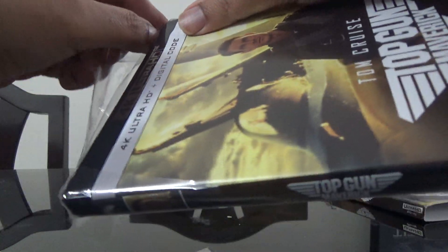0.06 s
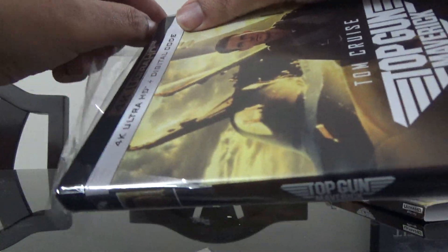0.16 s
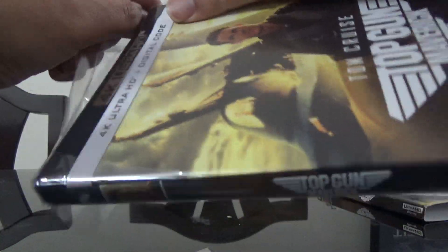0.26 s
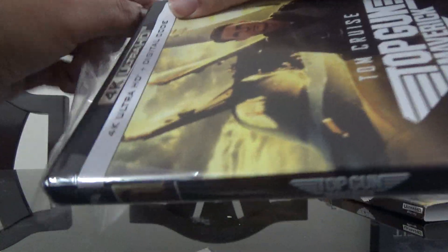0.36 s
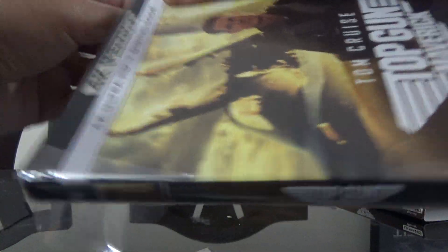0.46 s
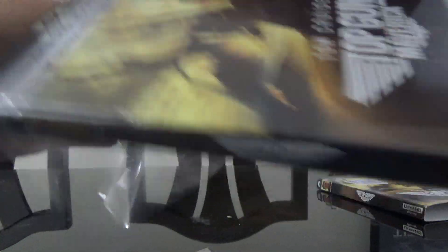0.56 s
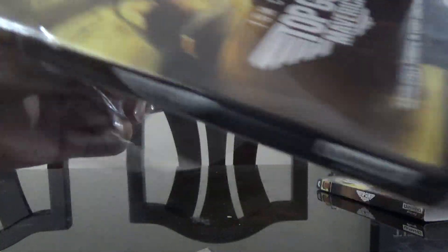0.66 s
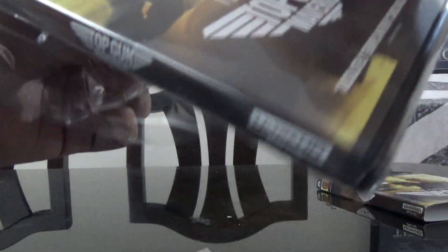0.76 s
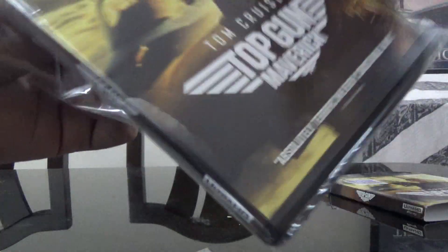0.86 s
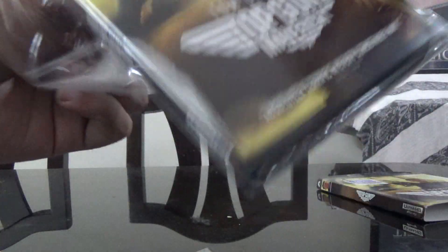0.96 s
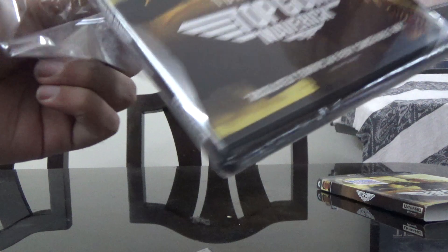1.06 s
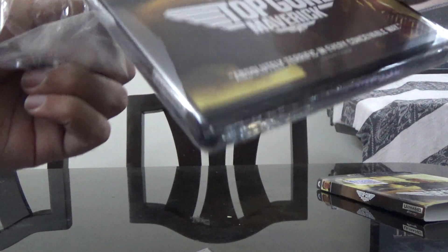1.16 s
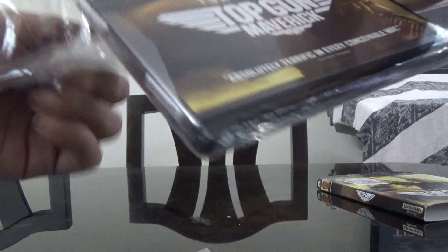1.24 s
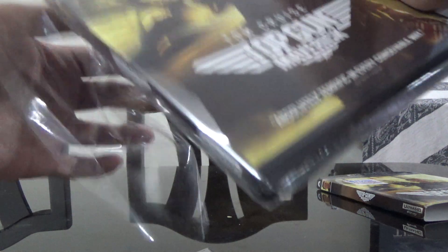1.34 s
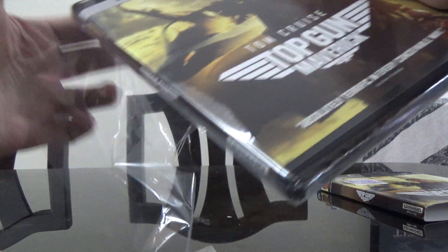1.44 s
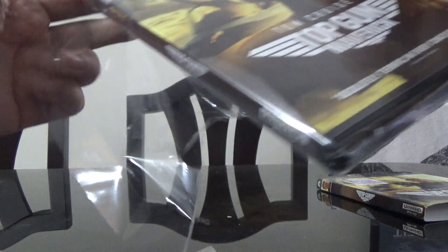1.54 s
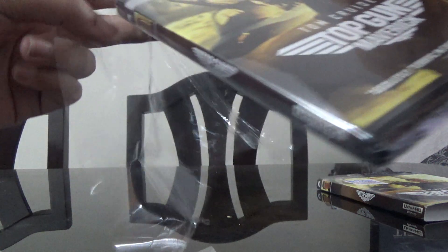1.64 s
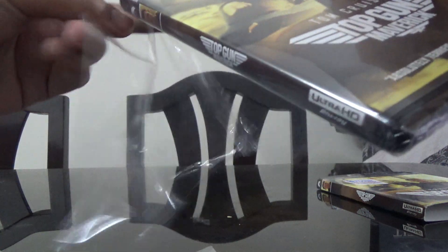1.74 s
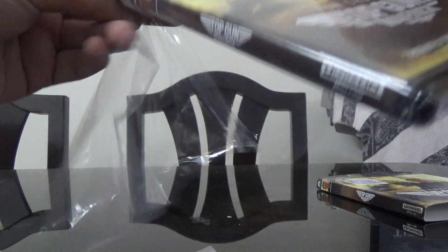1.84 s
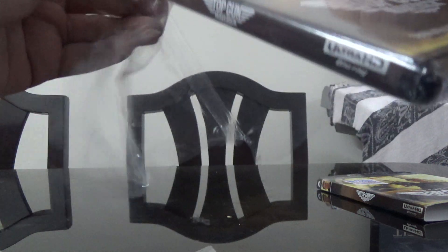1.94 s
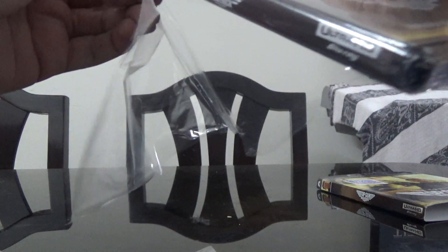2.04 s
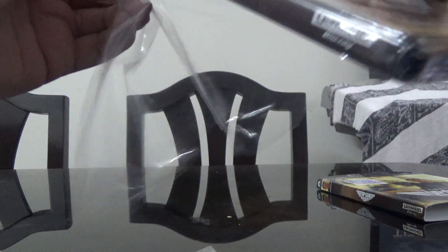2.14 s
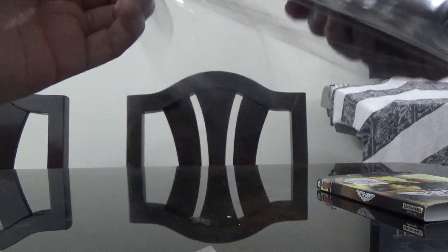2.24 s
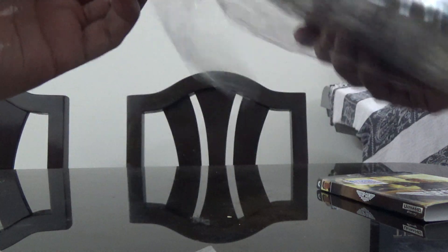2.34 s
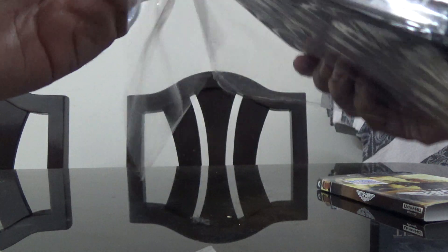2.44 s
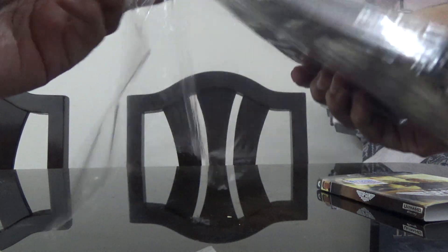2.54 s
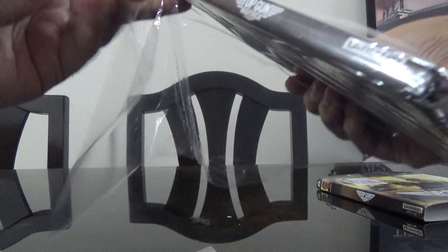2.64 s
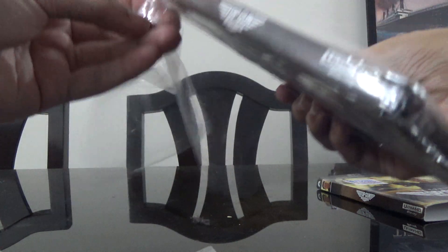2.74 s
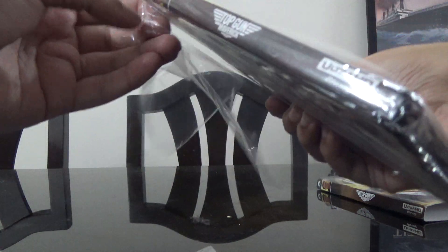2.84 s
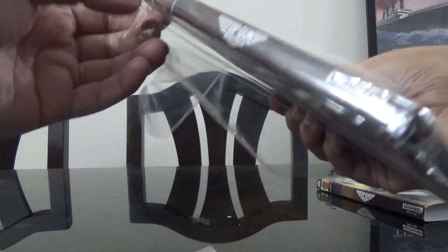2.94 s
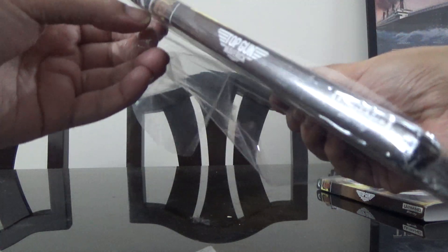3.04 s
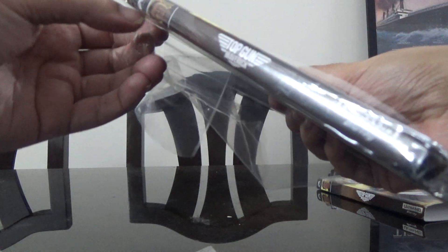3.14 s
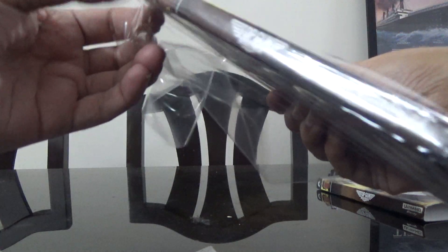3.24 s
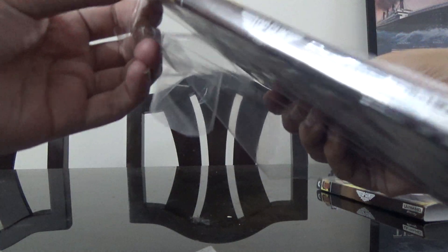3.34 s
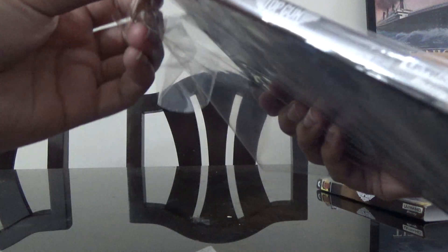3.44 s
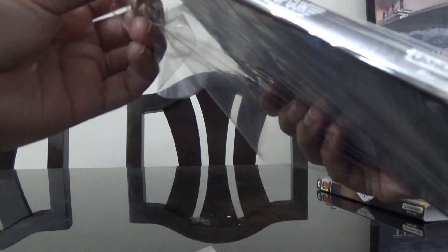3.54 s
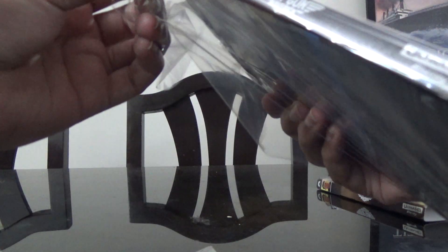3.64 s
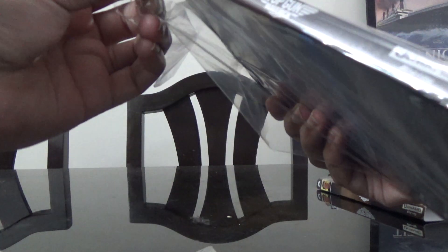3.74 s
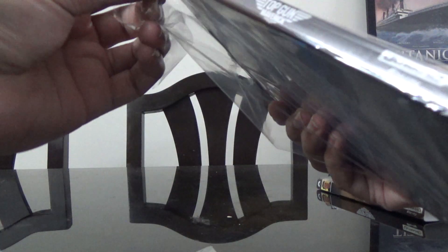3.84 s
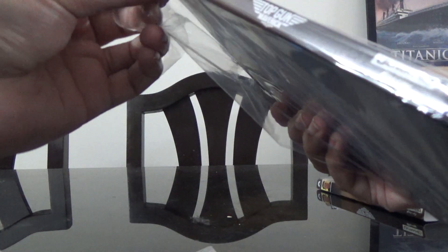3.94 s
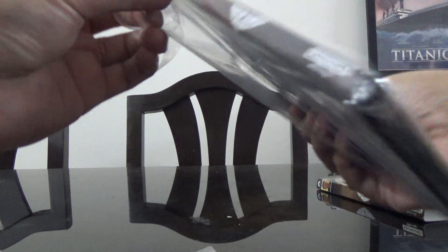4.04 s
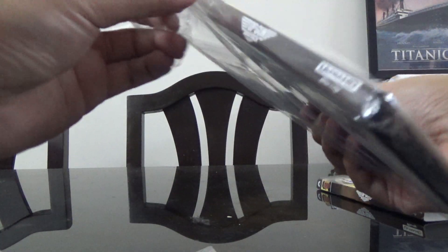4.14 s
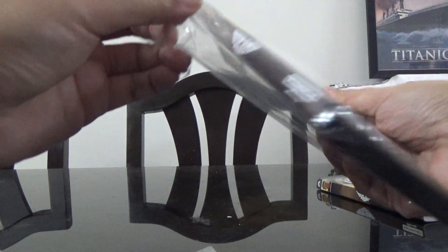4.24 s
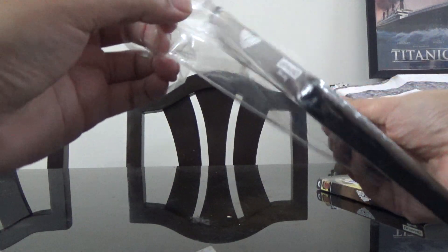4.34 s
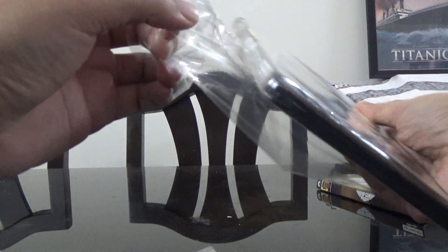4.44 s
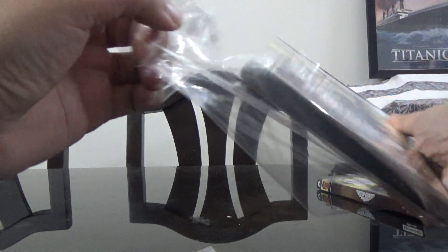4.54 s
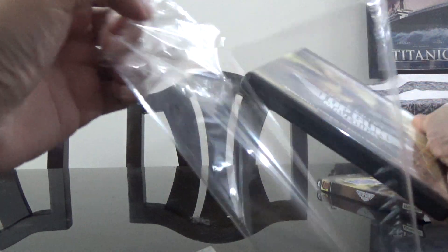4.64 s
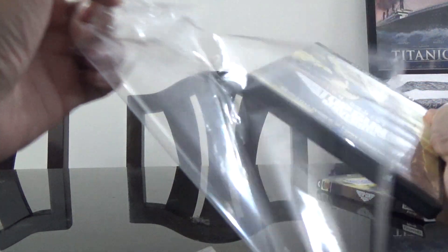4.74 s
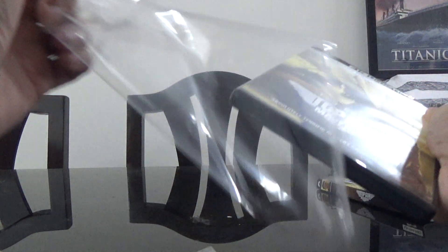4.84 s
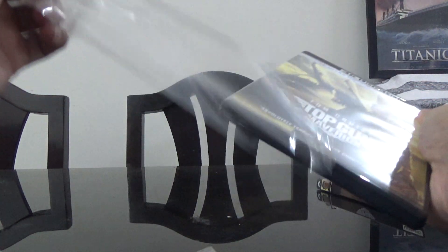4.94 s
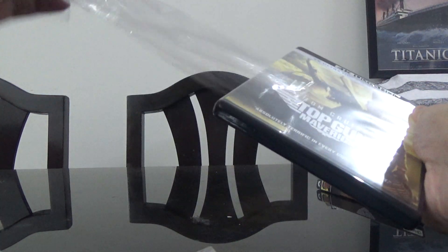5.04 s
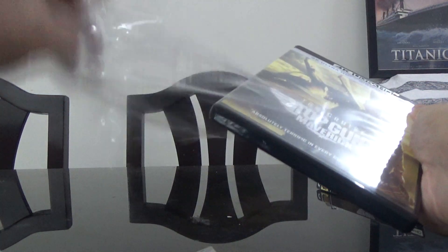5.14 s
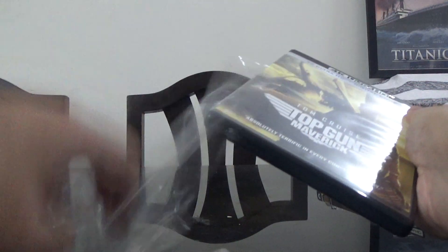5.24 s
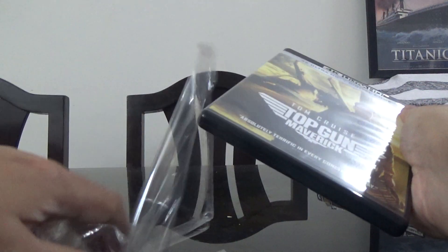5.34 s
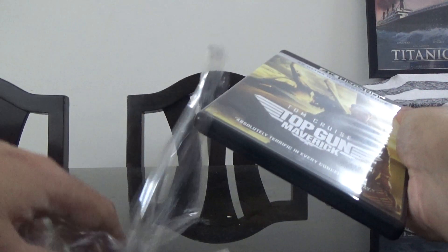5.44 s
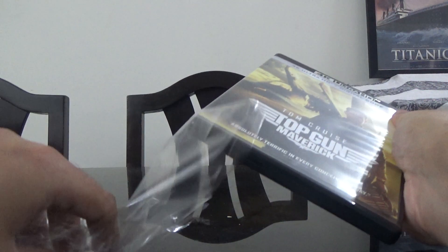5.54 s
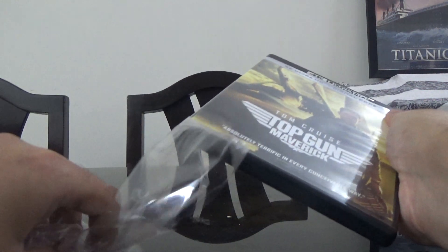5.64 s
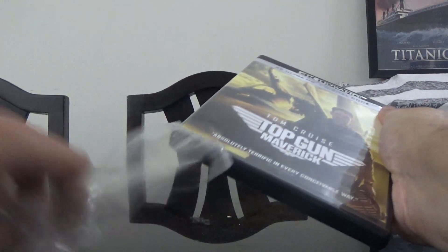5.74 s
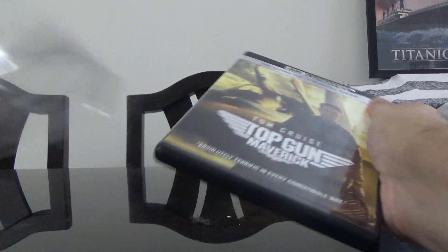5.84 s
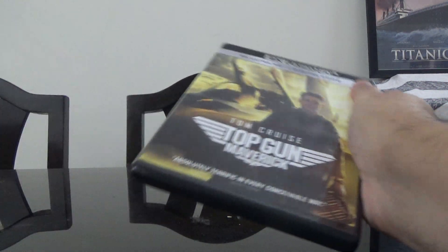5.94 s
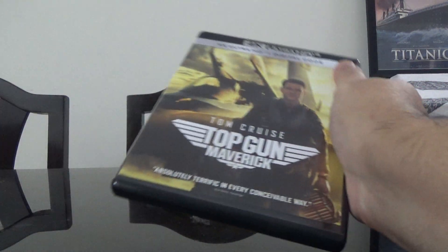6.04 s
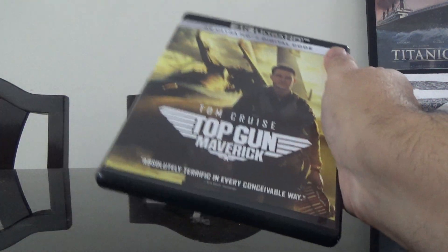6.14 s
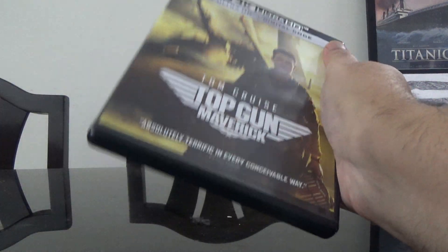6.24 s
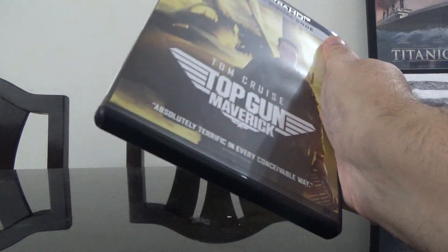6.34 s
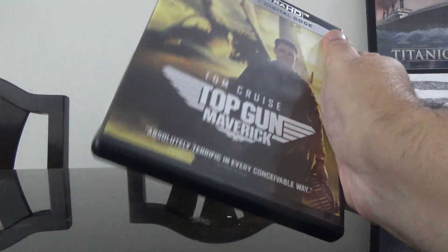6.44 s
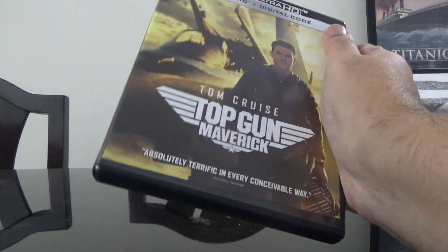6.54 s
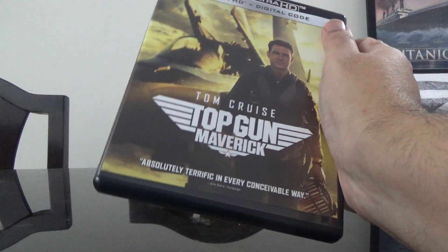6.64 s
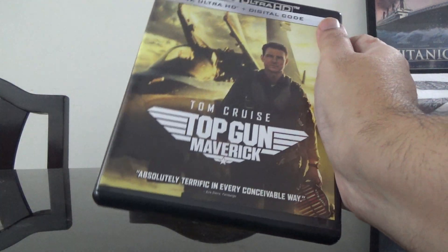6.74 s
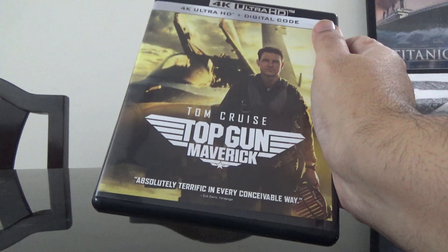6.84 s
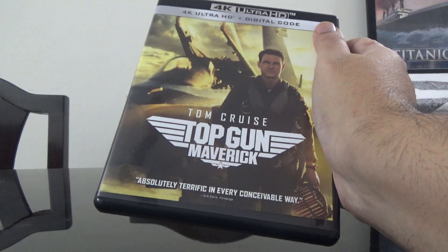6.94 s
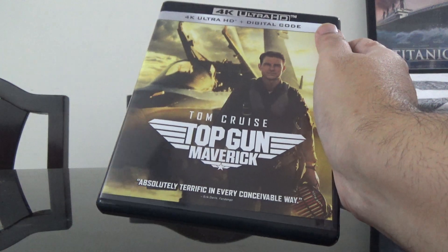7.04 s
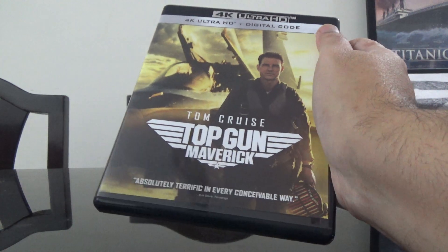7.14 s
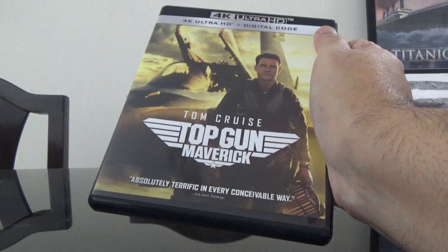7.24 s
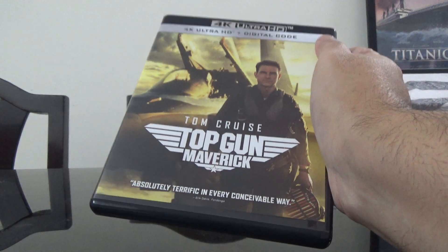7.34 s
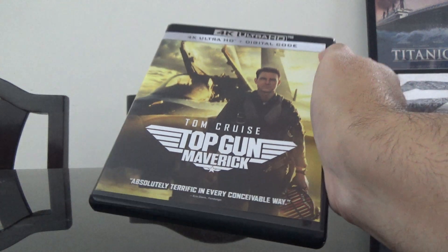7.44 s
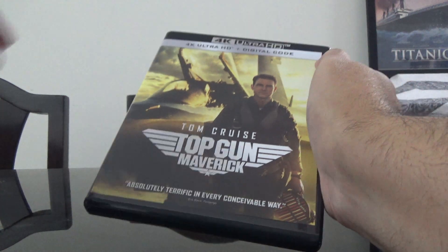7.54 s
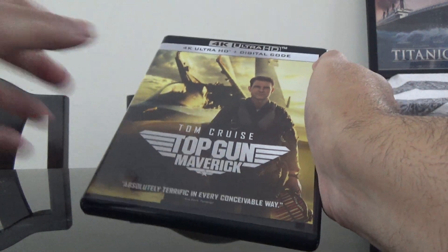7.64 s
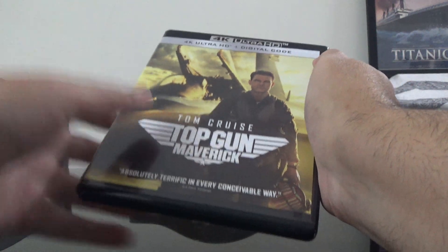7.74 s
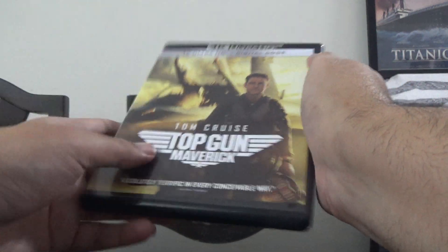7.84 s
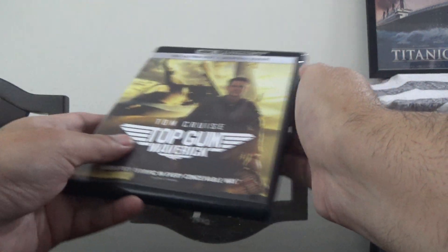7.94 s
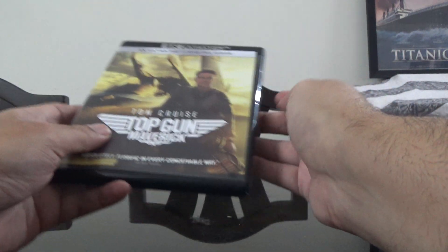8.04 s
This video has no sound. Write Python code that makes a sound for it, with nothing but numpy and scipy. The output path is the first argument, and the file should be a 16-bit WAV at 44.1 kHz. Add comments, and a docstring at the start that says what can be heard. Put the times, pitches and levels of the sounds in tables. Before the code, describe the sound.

Close, sharp crinkling and snapping of clear film being pulled from a plastic case, a denser hand crumple, soft rustles, and finally faint fingertip taps.

```python
"""Tiny clicks and loud snaps come first: shrink wrap is torn and peeled off a plastic disc case, close up in
a small room. The film is then crumpled in one hand and rustles off the back; fingers tap the case at the end.
Film: random ringing clicks in three bands, merging into smooth hiss at times; snaps are ringing noise bursts,
tears dense noise, short resonances filtered noise. Case: damped modes with a contact tick.
Room: early reflections, a decaying noise tail and steady faint air noise."""
import sys
import numpy as np
from scipy import signal
from scipy.fft import rfft, irfft, next_fast_len
from scipy.io import wavfile
from scipy.ndimage import uniform_filter1d

SR = 44100
rng = np.random.default_rng(int(sys.argv[2]) if len(sys.argv) > 2 else 0)


def output_pcm(signal):
    """Save a mono or channel-first signal as 16-bit PCM at the path in sys.argv[1].

    Samples are clipped to [-1, 1] before scaling.
    """
    pcm = np.clip(np.atleast_2d(signal).T, -1, 1) * 32767
    wavfile.write(sys.argv[1], SR, np.round(pcm).astype(np.int16))


N = 356308

# still air of the room: freq_hz, density_db [dB per Hz, relative]
AIR_SPECTRUM = [(30, -23), (60, -17), (140, -7.5), (250, -1.5), (700, -2.5), (1500, -9.5), (4000, -10.5),
                (9000, -29), (16000, -46)]
# decay of the room: freq_hz, t60_s
ROOM_DECAY = [(200, 0.31), (1500, 0.38), (5000, 0.19), (14000, 0.39)]
# stereo width over frequency: freq_hz, side_gain [ratio]
STEREO_WIDTH = [(130, 0.13), (300, 0.29), (1000, 1.25), (9000, 1.52), (13000, 0.4)]
# where the film is held: time_s, left_minus_right_db
FILM_PLACE = [(1.3, 1.1), (2.2, .45), (4.8, 0), (5.25, 1.3), (5.7, 1.7), (6.05, .15)]
# soft bumps of the hand on the hollow case: start_s, level_db
HAND_BUMPS = [(0.765, -39), (2.28, -40), (2.964, -27.5), (2.971, -32.5), (2.984, -31), (3.001, -42),
              (3.008, -30), (3.04, -36), (3.06, -41), (3.27, -30.5), (3.49, -38), (5.3, -32.5),
              (5.335, -36), (7.999, -44), (8.019, -45)]
# modes of the hollow case: freq_hz, level_db, t60_s
HOLLOW_MODES = [(177, -13.5, 0.077), (231.5, -3, 0.047), (355.6, 1.5, 0.037), (477, 0, 0.04),
                (577, -2.5, 0.046)]
# fingertips tap the lid: start_s, level_db
LID_TAPS = [(7.831, -32.5), (7.846, -39.5), (7.874, -45), (7.883, -31)]
# modes of the lid: freq_hz, level_db, t60_s
LID_MODES = [(690, -8.5, 0.026), (859, -2, 0.019), (1130, 7.5, 0.015), (1460, 3, 0.018), (1700, -8, .02),
             (2220, -1.5, 0.0203), (3070, -14, .012), (4683, -16, .012)]
# short resonant noises (tearing hiss, flexing case, a click, rubs): start_s, length_s, pitch_hz, level_db
FILM_RESONANCES = [(0.274, 0.023, 970, -39), (0.293, 0.053, 2400, -38.5), (0.596, 0.017, 2350, -32),
                   (2.9, 0.073, 2600, -42), (2.96, 0.071, 491, -41.5), (3.939, 0.00485, 1550, -30),
                   (7.977, 0.14, 2700, -59)]
# film tears in one dense run: start_s, length_s, level_db
FILM_TEARS = [(0.591, 0.0075, -26), (0.655, 0.016, -22), (0.998, 0.02, -27), (1.028, 0.00546, -21),
              (1.413, 0.0081, -23), (1.936, 0.011, -23.5), (2.181, 0.0077, -21), (2.288, 0.03, -22.5),
              (2.353, 0.012, -23), (2.378, 0.013, -26), (2.58, 0.019, -23.5), (2.734, 0.032, -26.5),
              (2.994, 0.011, -23.5), (3.097, 0.01, -30), (4.032, 0.021, -29), (4.607, 0.0076, -20.5),
              (4.648, 0.0076, -24), (5.2, 0.0111, -20.5), (5.352, 0.015, -21.5), (6.391, 0.013, -32)]
# loud snaps of single facets: start_s, peak_db, ring_hz, push_db [of the sheet around it]
FACET_SNAPS = [(0.01, -10, 10630, -30), (0.029, -8, 10900, -42), (0.0937, -21, 11000, -40),
               (0.1228, -16.5, 10800, -27), (0.1304, -24, 3570, -17), (0.2109, -18.5, 3580, -35),
               (0.231, -14.5, 4130, -27), (0.2575, -2.5, 9590, -25), (0.3707, -8.5, 8740, -25),
               (0.393, -13, 5660, -13), (0.4399, -7, 10700, -40.5), (0.4459, -4.5, 8800, -36),
               (0.4944, -8.5, 8360, -35.5), (0.5082, -11, 7950, -28), (0.5302, -13, 9890, -28),
               (0.586, -8, 6830, -29), (0.7152, -6, 4900, -31.5), (0.7307, -8.5, 4860, -18.5),
               (0.7503, -9, 4620, -11.5), (0.7721, -8, 7870, -13), (0.7973, -11.5, 4260, -15),
               (0.8068, -10.5, 5270, -16), (0.848, -11, 9700, -28), (0.934, -8, 9610, -15),
               (0.9433, -5, 4970, -20), (0.9831, -10, 4280, -31), (1.0048, -8, 5050, -22),
               (1.0224, -6, 5880, -19), (1.1125, -8, 5370, -39), (1.1245, -11.5, 9400, -38.5),
               (1.1814, -8.5, 7700, -29), (1.2047, -8, 9050, -38.5), (1.2184, -9, 5200, -24.5),
               (1.252, -12.5, 8570, -34.5), (1.3389, -6, 9540, -30), (1.359, -10.5, 6030, -31),
               (1.4088, -6.5, 8630, -16.5), (1.4474, -12, 9750, -30), (1.6287, -10, 6750, -20.5),
               (1.6401, -14, 7540, -19), (1.6681, -10, 5300, -24), (1.694, -11.5, 6680, -35),
               (1.7769, -10, 9260, -33), (1.8337, -6.5, 9240, -32.5), (1.876, -6, 4660, -24),
               (1.9234, -5.5, 5520, -30.5), (2.0403, -7.5, 5400, -24), (2.0884, -10.5, 4800, -43.5),
               (2.1418, -3, 4600, -22), (2.2691, -6, 8480, -24), (2.3291, -6, 8410, -33),
               (2.4174, -12, 4970, -33), (2.4687, -3.5, 4250, -30.5), (2.4879, -4, 5470, -36),
               (2.5721, -6.5, 4290, -29), (2.6182, -7, 9840, -32), (2.6264, -11, 8980, -33),
               (2.717, -10, 8590, -27.5), (2.8098, -6, 9490, -33), (2.8599, -11, 9120, -25),
               (2.922, -9, 9760, -28), (3.0012, -8.5, 6410, -25), (3.0598, -13, 9400, -25),
               (3.0658, -13, 4740, -29), (3.0959, -16, 6230, -30.5), (3.1151, -13, 9540, -30),
               (3.124, -18, 9600, -22), (3.2569, -6.5, 4730, -22.5), (3.2716, -5, 8877, -22),
               (3.3117, -9, 5740, -22), (3.3193, -5, 8960, -25.5), (3.4121, -7, 5700, -29),
               (3.4388, -8, 8940, -41), (3.4695, -7, 9040, -38), (3.4804, -15, 5870, -28),
               (3.5354, -11, 6480, -33), (3.5503, -9.5, 4640, -32.5), (3.6401, -9.5, 4020, -35),
               (3.665, -9.5, 6620, -31), (3.7358, -3, 9000, -28), (3.7608, -4, 9000, -42),
               (3.7634, -11, 9110, -38), (3.7981, -8.5, 10300, -34), (3.8232, -8, 3750, -35),
               (3.911, -10, 9000, -28), (3.949, -9.5, 4900, -36), (3.9943, -14.5, 4960, -19.5),
               (4.0264, -6, 11000, -23), (4.113, -6.5, 8350, -27.5), (4.1619, -11, 6820, -29),
               (4.2158, -6, 6700, -31), (4.3625, -6.5, 5710, -30), (4.4546, -7, 10600, -31),
               (4.4997, -3.5, 9810, -24.5), (4.5387, -6.5, 4350, -26), (4.6314, -9, 10800, -26),
               (4.78, -9, 4440, -21.5), (5.017, -9.5, 5070, -30.5), (5.1196, -4.5, 4200, -26),
               (5.2964, -3, 9280, -20.5), (5.4445, -7.5, 7060, -20), (5.6037, -12, 4270, -30),
               (5.7839, -9.5, 3850, -20.5), (5.814, -9, 8080, -25), (6.0054, -16, 5330, -29),
               (6.054, -17, 9790, -28.5), (6.2292, -14, 10400, -20), (6.3785, -11, 10440, -25),
               (6.4929, -13, 3500, -23), (6.6129, -11, 10800, -29), (6.7242, -10, 9400, -25),
               (7.314, -13.5, 6500, -36), (7.5517, -28, 7370, -31)]
# colour of the film when peeled: freq_hz, density_db [dB per Hz, relative]
PEELED_COLOUR = [(59, -59), (100, -30.5), (219, -16), (452, -13.5), (676, -6), (950, -10), (1450, -7),
                 (2520, -7), (3540, -0.5), (4020, 2), (4770, 4), (7290, 0.5), (9610, 4.5), (14400, -5.5),
                 (16000, -8)]
# when crumpled: freq_hz, density_db [dB per Hz, relative]
CRUMPLED_COLOUR = [(59, -60.5), (100, -37), (215, -15), (415, -14), (608, -2.5), (872, -7.5), (2470, 1.5),
                   (3320, -5), (4290, 1.5), (5530, -3.5), (9820, 5.5), (12400, 0), (16000, -7)]
# when slid off: freq_hz, density_db [dB per Hz, relative]
SLID_COLOUR = [(60, -62), (100, -30.5), (300, -16.5), (690, -3.5), (1150, -5), (1600, -0.5), (1900, 1),
               (2470, -8), (3300, -3), (3900, -7), (5500, -5.5), (10700, 0.5), (12900, -5), (16000, -11)]
# how far the clicks merge into smooth hiss, in tearing, sliding or fading: time_s, hiss_to_clicks [ratio]
HISS_SHARE = [(0.258, 0.09), (0.268, 1.1), (0.35, 2.7), (0.375, 0.18), (4.8, 0.12), (5.2, 0.76),
              (5.85, 0.346), (6.1, 0.71), (7.2, 1), (7.4, 2.32)]
# tautness of the film between moves: time_s, crackle_db
FILM_TENSION = [(0, -48), (.24, -56.5), (.3, -41), (1.0, -36.5), (1.28, -43), (1.59, -51), (1.9, -40),
                (2.45, -38), (2.67, -44), (2.9, -38.5), (3.14, -52), (3.35, -46), (3.97, -47), (4.3, -39.5),
                (4.74, -43.5), (4.88, -57), (4.96, -59), (5.2, -34), (5.7, -39), (5.94, -48.5), (6.3, -46),
                (6.8, -44.5), (7.25, -62.5), (7.45, -59.5), (7.8, -69), (8.05, -59.5)]
# pulls that peel the film off: start_s, length_s, level_db, brightness_db
PULL_MOVES = [(0, .03, -45, 3), (.255, 0.152, -38, 0), (.475, 0.055, -39, 5.5), (.57, 0.05, -34.5, 6.5),
              (.64, 0.041, -29.5, 1.5), (.71, 0.0567, -32.5, -4), (.79, 0.1377, -32, -1),
              (.93, 0.1024, -30.5, 1), (1.04, 0.029, -33, 1), (1.195, .02, -40, -2), (1.305, 0.078, -31, 2),
              (1.403, .045, -29.5, 1), (1.623, 0.025, -31.5, 1.5), (1.675, 0.031, -40.5, 5.5),
              (1.748, 0.041, -40.5, 3.5), (1.803, .018, -33, -3), (1.865, 0.023, -32, 1.5),
              (1.905, 0.063, -29.5, 2.5), (1.985, 0.0479, -33, 3.5), (2.115, 0.0306, -36, 1),
              (2.172, 0.047, -33.5, 2.5), (2.245, 0.083, -26.5, 1.5), (2.345, 0.0401, -26.5, 2),
              (2.445, 0.027, -29.5, 3), (2.54, 0.048, -31.5, -1), (2.612, 0.016, -33.5, 0),
              (2.712, 0.08, -30, 1.5), (2.8, 0.031, -36.5, 1), (2.855, 0.033, -34.5, -2.5),
              (2.925, 0.069, -36, -1.5), (3.2, 0.038, -37.5, 2.5), (3.253, 0.017, -35, -6),
              (3.39, 0.027, -38.5, -1), (3.48, .03, -40.5, 1), (3.55, 0.0458, -36, -0.5),
              (3.73, 0.025, -41.5, -4), (3.81, 0.051, -42.5, 3.5), (4.022, 0.031, -27.5, 3.5),
              (4.07, .048, -33.5, 4.5), (4.175, .065, -33, 3), (4.355, 0.035, -36, 1),
              (4.41, 0.038, -38, 5), (4.495, 0.018, -28.5, 2), (4.565, 0.0522, -31.5, 3.5),
              (4.628, 0.058, -33, 2.5), (4.72, 0.0267, -38.5, 6), (4.772, 0.0083, -34.5, 1)]
# squeezes that crumple the loose film in one hand: start_s, length_s, level_db, brightness_db
SQUEEZE_MOVES = [(4.965, 0.071, -42.5, 0.5), (5.03, 0.15, -33.5, 1.5), (5.18, 0.09, -30, -0.5),
                 (5.262, 0.053, -23.5, -2.5), (5.335, 0.071, -31, -4), (5.43, 0.058, -32, -4),
                 (5.488, .14, -25.5, -3.5), (5.64, 0.101, -32.5, -4), (5.782, 0.051, -33, -4),
                 (5.85, 0.064, -42, -7)]
# strokes that draw the last of it off the back: start_s, length_s, level_db, brightness_db
STROKE_MOVES = [(5.99, 0.117, -42, 7), (6.115, 0.14, -40.5, 4.5), (6.35, 0.061, -37.5, 3),
                (6.43, 0.12, -42.5, 3), (6.645, 0.03, -42, 2), (6.72, 0.11, -41, 3.5), (6.87, 0.11, -59, 0),
                (7.01, 0.086, -53.5, 6), (7.135, 0.0138, -52.5, 7), (7.305, 0.015, -46, 10),
                (7.35, .02, -53.5, 8)]

# shared by all moves of one kind; folds_db: broad folds against creases in a firm move
PULL = dict(attack_s=0.01, release_s=0.016, folds_db=-7.5)
SQUEEZE = dict(attack_s=0.015, release_s=0.02, folds_db=-8.5)
STROKE = dict(attack_s=0.01, release_s=0.03, folds_db=-1.2)

# level of a firm move; folds grow more slowly than creases, and less in a bright move (dB per dB)
FIRM_DB, FOLD_GROWTH, FOLD_TILT = -35, 0.83, 0.5
GRIP_FOLDS_DB, GRIP_FINE_DB = -7, 1.5  # balance of the crackle between moves
JERK_PER_S, JERK_DB = 70, 1.49  # the film yields in small jerks
SNAP_DELAY_S = 0.0006  # every snap sounds this long after its listed time

# lesser snaps: peak over the crackle, ring, push of the sheet
SMALL_SNAP_DB, SMALL_SNAP_SPREAD_DB, SMALL_SNAP_HZ, SMALL_SNAP_PUSH_DB = 19, 4, 7440, -23
# dB of odds gained, and dB of prominence lost, per dB of crackle
SMALL_SNAP_ODDS, SMALL_SNAP_MASKING = 0.5, 0.39

TOP_HZ = 15950  # upper band limit


def amp(db):
    """Decibels to gain."""
    return 10 ** (np.asarray(db) / 20)


def unit(x):
    """Scale to rms 1."""
    return x / np.sqrt(np.mean(x ** 2) + 1e-20)


def along(points, hz):
    """Read (freq_hz, value) points on a log axis."""
    point_hz, value = np.transpose(points)
    return np.interp(np.log(hz + 1), np.log(point_hz + 1), value)


def below(hz, edge_hz, order=4):
    """Gain of a smooth low-pass."""
    return 1 / np.sqrt(1 + (hz / edge_hz) ** (2 * order))


def above(hz, edge_hz, order=4):
    """Gain of the matching high-pass."""
    return (hz / edge_hz) ** order * below(hz, edge_hz, order=order)


def causal(gain, size=1024):
    """Impulse response that starts at once (minimum phase) with this gain of frequency."""
    magnitude = np.maximum(gain(np.fft.rfftfreq(size, 1 / SR)), 1e-5)
    cepstrum = irfft(np.log(magnitude))
    cepstrum[..., 1:size // 2] *= 2
    cepstrum[..., size // 2 + 1:] = 0
    return irfft(np.exp(rfft(cepstrum)))


def coloured(x, gain):
    """Stereo x through a causal filter."""
    return signal.fftconvolve(x, causal(gain)[None], axes=1)[:, :N]


def placed(start_s, sounds, spread_db):
    """Sum short sounds at their times, each a little to the left or right."""
    first = np.round(start_s * SR).astype(int)[:, None]
    index = (first + np.arange(sounds.shape[1])).ravel()
    pan_db = spread_db * rng.standard_normal((len(start_s), 1))
    sides = [np.bincount(index, (sounds * amp(side * pan_db)).ravel(), N)[:N] for side in (1, -1)]
    return np.array(sides)


def narrowed(pair, width):
    """Left and right from a middle and a side signal; width scales the side."""
    middle, side = pair
    return middle + width * side * np.array([[1], [-1]])


def air(level_db=-60):
    """Steady faint noise of the room, shaped by its spectrum."""
    pair = narrowed(rng.standard_normal((2, N)), width=0.71)
    gain = amp(along(AIR_SPECTRUM, np.fft.rfftfreq(N, 1 / SR)))
    return amp(level_db) * unit(irfft(rfft(pair) * gain, N))


def room(x, table_db=-15, tail_db=-13, width=0.51):
    """The table top and nearby things answer within milliseconds, the walls more slowly."""
    hz, frame_s, frames = signal.stft(rng.standard_normal((2, SR // 2)), SR, nperseg=256)
    decay = np.exp(-np.log(1000) * frame_s / along(ROOM_DECAY, hz)[:, None])
    tail = signal.istft(frames * decay, SR, nperseg=256)[1]
    age_s = np.arange(tail.shape[1]) / SR
    sparse = rng.standard_normal(tail.shape) * (rng.random(len(age_s)) < 0.04)
    near = sparse * np.exp(-age_s / 0.0027)
    answer = narrowed(amp(table_db) * unit(near) + amp(tail_db) * unit(tail), width)
    answer = answer / np.sqrt(len(age_s) * (1 + width ** 2))
    answer = np.pad(answer, ((0, 0), (round(0.003 * SR), 0)))  # no reflection before 3 ms
    return signal.fftconvolve(x.mean(0)[None], answer, axes=1)[:, :N]


def knocks(blows, modes, attack_s, tick_db):
    """Every blow rings the damped modes of the case at new strengths, with a short tick of contact."""
    start_s, level_db = np.transpose(blows)
    hz, mode_db, t60_s = np.transpose(modes)[:, :, None]
    t = np.arange(SR // 5) / SR
    tones = np.sin(2 * np.pi * (hz * t + rng.random(hz.shape)))
    rings = amp(mode_db) * np.exp(-np.log(1000) * t / t60_s) * tones
    strengths = amp(2.5 * rng.standard_normal((len(start_s), len(hz))))
    ring = strengths @ rings * (1 - np.exp(-t / attack_s))
    tick = amp(tick_db) * np.exp(-t / 0.00233) * rng.standard_normal(ring.shape)
    tick = signal.sosfilt(signal.butter(1, [300, 7000], "band", fs=SR, output="sos"), tick)
    return placed(start_s, amp(level_db)[:, None] * (ring / 2 + tick), spread_db=3)


def resonances(sharpness=4.8):
    """Noise drives one resonance per event, swelling and fading: tearing hiss, flexing case, a click, rubs."""
    start_s, length_s, ring_hz, level_db = np.transpose(FILM_RESONANCES)[:, :, None]
    t = np.arange(SR // 6) / SR
    hz = np.fft.rfftfreq(len(t), 1 / SR) + 1
    resonance = 1 / (1 + (sharpness * (hz / ring_hz - ring_hz / hz)) ** 2)
    noise = rng.standard_normal((len(start_s), len(t)))
    ringing = irfft(rfft(noise) * resonance, len(t))
    ringing = ringing / ringing.std(1, keepdims=True)
    swell = np.sin(np.pi * np.minimum(t / length_s, 1))
    return placed(start_s[:, 0], amp(level_db) * swell * ringing, spread_db=0.5)


def tears(ragged=0.42):
    """A crack runs through the film: clicks too close to tell apart, as noise of ragged strength."""
    start_s, length_s, level_db = np.transpose(FILM_TEARS)[:, :, None]
    t = np.arange(SR // 30) / SR
    progress = np.minimum(t / np.maximum(length_s, 0.003), 1)
    run = np.sqrt(np.abs(np.sin(np.pi * progress)))
    flutter = unit(uniform_filter1d(rng.standard_normal(run.shape), size=40))
    burst = unit(np.exp(ragged * flutter) * rng.standard_normal(run.shape))
    train = placed(start_s[:, 0], amp(level_db) * run * burst, spread_db=0.5)
    colour = lambda hz: amp(along(PEELED_COLOUR, hz))
    return coloured(train, colour) / np.linalg.norm(causal(colour))


def effort(moves, attack_s, release_s, folds_db):
    """Power of folds, creases and fine crinkles: each move builds up, holds and lets go."""
    t = np.arange(0, N / SR, 0.001)
    start_s, length_s, level_db, bright_db = np.transpose(moves)[:, :, None]
    attack = np.clip((t - start_s) / attack_s, 0, 1)
    release = np.exp(-np.maximum(t - start_s - length_s, 0) / release_s)
    shape = attack * release
    fold_db = FIRM_DB + folds_db + FOLD_GROWTH * (level_db - FIRM_DB) - FOLD_TILT * bright_db
    levels_db = (fold_db, level_db, level_db + bright_db)
    powers = [np.sum((shape * amp(db)) ** 2, 0) for db in levels_db]
    return np.array([np.interp(np.arange(N) / SR, t, power) for power in powers])


def strain():
    """Level in dB of the three sizes of fold: tension between moves plus the moves, a little jerky."""
    t = np.arange(N) / SR
    tension_db = np.interp(t, *np.transpose(FILM_TENSION))
    fold_db = FIRM_DB + GRIP_FOLDS_DB + FOLD_GROWTH * (tension_db - FIRM_DB)
    power = amp([fold_db, tension_db, tension_db + GRIP_FINE_DB]) ** 2
    power = power + effort(PULL_MOVES, **PULL)
    power = power + effort(SQUEEZE_MOVES, **SQUEEZE)
    power = power + effort(STROKE_MOVES, **STROKE)
    jerks = np.interp(t * JERK_PER_S, np.arange(2000), rng.standard_normal(2000))
    hiss = np.interp(t, *np.transpose(HISS_SHARE))
    evenness = np.sqrt(1 + (2 * hiss) ** 2)  # the level is steadier where hiss prevails
    return 10 * np.log10(power) + JERK_DB * jerks / evenness


def small_snaps(strain_db, count=170):
    """Rows of lesser snaps at random moments, likelier and louder with strain, none once strokes begin."""
    moment, chance, size, pitch, push = rng.random((count, 5)).T
    start_s = moment * STROKE_MOVES[0][0]
    crackle_db = strain_db[np.round(start_s * SR).astype(int)]
    firmness_db = crackle_db - FIRM_DB
    peak_db = crackle_db + SMALL_SNAP_DB + SMALL_SNAP_SPREAD_DB * (2 * size - 1)
    peak_db = peak_db - SMALL_SNAP_MASKING * firmness_db
    ring_hz = SMALL_SNAP_HZ * 2 ** (1.3 * (pitch - 0.5))
    push_db = SMALL_SNAP_PUSH_DB + 16 * (push - 0.5)
    rows = np.transpose([start_s, peak_db, ring_hz, push_db])
    return rows[chance < amp(SMALL_SNAP_ODDS * firmness_db)]


def snaps(rows, facet_life_s=0.00082, sheet_life_s=0.00146, edge=0.316, shiver_db=-15, shiver_life_s=0.0019,
          ring_db=12, ring_width=0.46, crest_db=8.5, sheet_db=10):
    """A facet flips with a sharp edge, rings for a few cycles and pushes the sheet, which shivers on."""
    start_s, peak_db, ring_hz, push_db = np.transpose(rows)
    t = np.arange(512) / SR

    def burst(life_s, gain):
        """One coloured burst per snap, with the energy of a millisecond at rms 1."""
        fade = (1 + t / life_s) * np.exp(-1.6 * t / life_s)
        fade = fade + amp(shiver_db) * np.exp(-t / shiver_life_s)
        kick = rng.choice([-1, 1], (len(start_s), len(t))) * fade + edge * (t == 0)
        sound = signal.fftconvolve(kick, np.atleast_2d(causal(gain)), axes=1)
        return sound / np.linalg.norm(sound, axis=1, keepdims=True) * np.sqrt(SR / 1000)

    film_db = lambda hz: along(PEELED_COLOUR, hz)
    peak = lambda hz: ring_db * np.exp(-(np.log((hz + 1) / ring_hz[:, None]) / ring_width) ** 2)
    facet = burst(facet_life_s, lambda hz: amp(film_db(hz) + peak(hz)) * above(hz, 2300))
    sheet = burst(sheet_life_s, lambda hz: amp(film_db(hz)) * below(hz, 2295) * above(hz, 233, order=1))
    both = facet + amp(push_db + sheet_db)[:, None] * sheet
    return placed(start_s + SNAP_DELAY_S, amp(peak_db - crest_db)[:, None] * both, spread_db=0.05)


def clicks(start_s, sizes, band_hz, life_s, hiss, rough):
    """Each buckle rings briefly at the pitch of its own facet; film rubbing on film hisses between them."""
    t = np.arange(240) / SR
    hz = rng.uniform(*band_hz, (len(start_s), 1))
    burst = np.sin(2 * np.pi * hz * t) + rough * rng.standard_normal((len(start_s), len(t)))
    strengths = sizes * amp(2 * rng.standard_normal(hz.shape))
    train = placed(start_s, strengths * burst * np.exp(-t / life_s), spread_db=1.1)
    # even out the slow level of the clicks
    local_power = uniform_filter1d(np.mean(train ** 2, 0), size=1500)
    local_power = np.abs(uniform_filter1d(local_power, size=1500)) + 1e-6
    return unit(train / np.sqrt(local_power) + hiss * rng.standard_normal(N))


def crinkle(folds_db, creases_db, fine_db, count=10000, scatter_db=6):
    """Tiny buckles of very unequal size; the harder the film is worked, the faster they come."""
    t = np.arange(N) / SR
    # of all the facets under strain, only a share gives way
    start_s = rng.uniform(0, N / SR, count)
    odds = amp(0.42 * (np.interp(start_s, t, creases_db) + 31))
    gives_way = rng.random(count) < odds
    sizes = (gives_way * amp(scatter_db * rng.standard_normal(count)))[:, None]
    # broad folds ring longer than fine ones
    folds = clicks(start_s, sizes, (200, 2600), life_s=0.0012, hiss=0.9, rough=1.0)
    creases = clicks(start_s, sizes, (2400, 7200), life_s=0.0012, hiss=0.41, rough=1.0)
    fine = clicks(start_s, sizes, (6800, 14000), life_s=0.00061, hiss=0.068, rough=0.7)
    # level with trim, clicks, band
    scales = [(folds_db + 0.19, folds, lambda hz: below(hz, 2850)),
              (creases_db + 0.32, creases, lambda hz: above(hz, 2320) * below(hz, 7400, order=6)),
              (fine_db + 0.5, fine, lambda hz: above(hz, 5300, order=6))]
    loose = np.interp(t, [4.9, 5.2], [0, 1])
    slid = np.interp(t, [5.8, 6], [0, 1])
    states = [(PEELED_COLOUR, 1 - loose), (CRUMPLED_COLOUR, loose - slid), (SLID_COLOUR, slid)]
    hiss = np.interp(t, *np.transpose(HISS_SHARE))
    film = np.zeros((2, N))
    for level_db, train, band in scales:
        # the clicks merge into hiss
        train = (train + hiss * rng.standard_normal(N)) / np.sqrt(1 + hiss ** 2)
        for colour, share in states:
            layer = unit(coloured(train, lambda hz: amp(along(colour, hz)) * band(hz)))
            film += share * amp(level_db) * layer
    return film


def scene():
    """Film and case in the room."""
    strain_db = strain()
    all_snaps = np.vstack([FACET_SNAPS, small_snaps(strain_db[1])])
    film = crinkle(*strain_db) + snaps(all_snaps) + tears() + resonances()
    case = knocks(HAND_BUMPS, HOLLOW_MODES, attack_s=0.001, tick_db=-20.5)
    case = case + knocks(LID_TAPS, LID_MODES, attack_s=0.00043, tick_db=-5.0)
    case = coloured(case, lambda hz: above(hz, 130, order=2))  # the knocks carry no deep bass
    pan_db = np.interp(np.arange(N) / SR, *np.transpose(FILM_PLACE))
    direct = (film + case) * amp(pan_db * np.array([[0.5], [-0.5]]))
    return direct + room(direct) + air()


def record(dry):
    """The tallest peaks are rounded off, the stereo image is narrow in bass and top, the band is limited."""
    ceiling = 0.7
    dry = dry / (1 + (dry / ceiling) ** 4) ** (1 / 4)
    size = next_fast_len(N + SR // 2)
    hz = np.fft.rfftfreq(size, 1 / SR)
    left, right = rfft(dry, size)
    pair = narrowed([(left + right) / 2, (left - right) / 2], along(STEREO_WIDTH, hz))
    return irfft(pair * (hz < TOP_HZ), size)[:, :N]


dry = scene()
out = record(dry)
output_pcm(out)
```